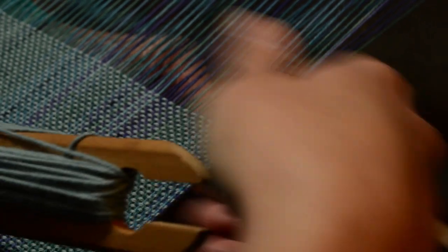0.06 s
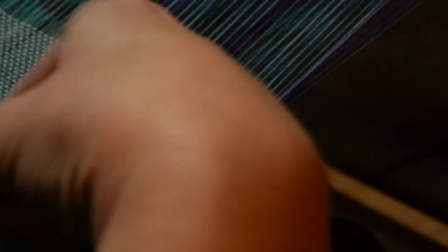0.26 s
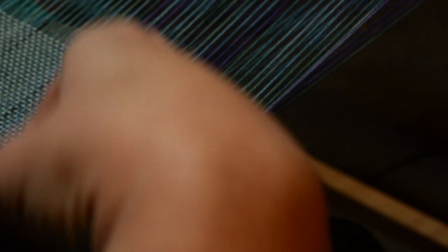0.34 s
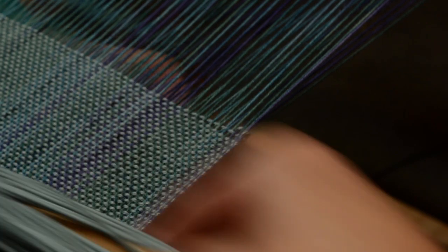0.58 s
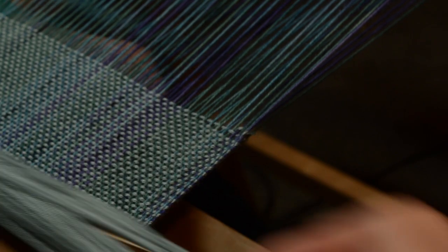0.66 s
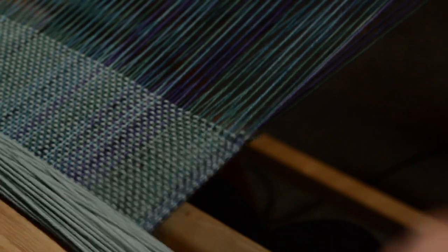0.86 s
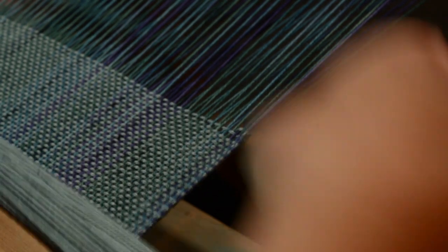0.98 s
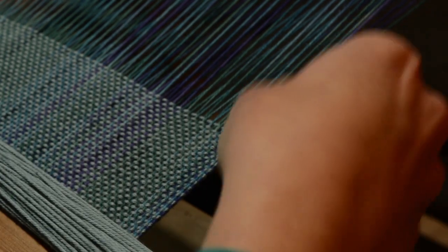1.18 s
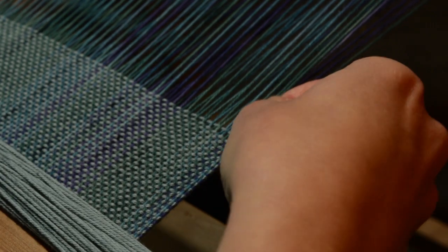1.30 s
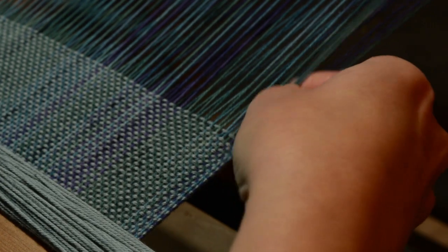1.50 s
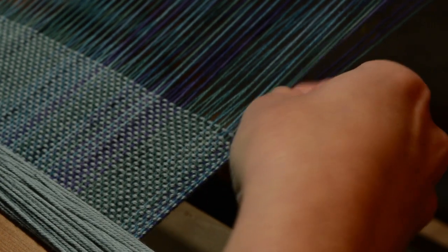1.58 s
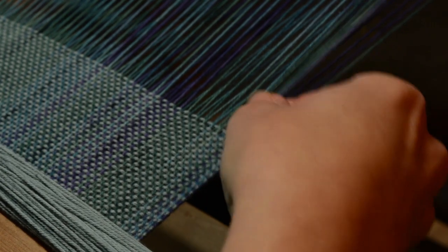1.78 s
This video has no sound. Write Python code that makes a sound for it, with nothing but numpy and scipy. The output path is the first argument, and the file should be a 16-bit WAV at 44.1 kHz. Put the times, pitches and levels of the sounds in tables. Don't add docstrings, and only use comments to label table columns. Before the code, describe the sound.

A wooden shuttle strikes a loom with one loud, dry clack, then chatters and scrapes briefly; yarn rustles, the frame thumps softly and fingers stroke taut threads, close-miked in a small quiet room.

```python
import sys
import numpy as np
from scipy import signal
from scipy.fft import rfft, irfft
from scipy.io import wavfile
from scipy.ndimage import uniform_filter1d

SR = 44100
rng = np.random.default_rng(int(sys.argv[2]) if len(sys.argv) > 2 else 0)


def put_to_file(sound):
    columns = np.atleast_2d(sound).T
    safe = np.clip(columns, -1, 1)
    whole_steps = np.round(safe * 32767)
    wavfile.write(sys.argv[1], SR, whole_steps.astype(np.int16))


def convert_level_to_amplitude(level_db):
    exponent = np.asarray(level_db, float) / 20
    return 10 ** exponent


N = 81585

# t/s, level/dB, contact/ms
KNOCKS = [
    (0.233, 2, 0.15),
    (0.7297, -31, 0.69),
]
# f/Hz, level/dB, T60/s
WOOD_MODES = [(237, -21.5, 0.083), (325, -21.5, 0.066), (498, -15.5, 0.045), (597, -20, 0.015),
              (879, -10, 0.025), (994, -15, 0.031), (1250, -12.5, 0.03), (1516, -11.5, 0.029),
              (1729, -13, 0.06), (2230, -14, 0.027), (2800, -9, 0.026), (3380, -14, 0.028),
              (3880, -26.5, 0.018)]
# f/Hz, width/Hz, level/dB
CLACK = [(1113.6, 460, 29.5), (2570, 1300, 16), (5220, 750, 7)]
# t/s, level/dB, f/Hz
TICKS = [(.1195, -37, 1500), (.1315, -34, 2900), (.1265, -30.5, 1410), (.1268, -35, 2750),
         (.139, -33, 3500), (.2392, -16, 1810), (.2418, -21, 3300), (0.2426, -19, 1750),
         (0.2494, -15.5, 1200), (.2505, -40, 5100), (.268, -43, 5000), (.259, -25, 1150),
         (.2635, -23, 1100), (.268, -27, 1150), (.2745, -26, 1300), (.281, -26, 1300), (.2845, -33, 1160),
         (.2645, -31, 3300), (.318, -35, 1300), (.393, -29, 1220), (.409, -30, 1050), (.4175, -27.5, 1090),
         (.421, -27, 3500), (.4455, -28, 2900), (.424, -22.5, 1280), (.431, -21.5, 1015),
         (.4405, -19.5, 2920), (.4415, -18, 1130), (.447, -20, 1320), (.453, -21, 1230),
         (.4585, -19.5, 1170), (.468, -29, 1250), (.475, -24.5, 1250), (.487, -28.5, 1140),
         (.5778, -23.5, 3030), (.5805, -27.5, 902), (.586, -25.5, 950), (.5915, -27, 1490),
         (.5945, -26.5, 1086), (.5965, -26, 4700), (.5985, -20, 2080), (.6045, -20, 1590),
         (.6095, -20, 2310), (.6135, -30.5, 1006), (.579, -33, 4700), (.579, -38, 491), (.5775, -19, 906),
         (.601, -30, 1900), (1.049, -46.5, 660), (1.051, -43, 1505), (1.056, -41.5, 3300),
         (1.403, -50, 4250)]
# t/s, level/dB, contact/ms
SCUFF_TAP = (.5777, -25, 0.066)

# start t/s, rise/s, hold/s, level/dB, fall T60/s
SCUFFS = [
    (.576, 0.0036, 0.012, -33.5, 0.09),
    (.585, 0.007, 0.021, -35, 0.045),
]
SLIDES = [
    (.238, 0.0034, 0.0018, -29.5, 0.21),
    (.33, 0.095, 0.02, -32.5, 0.19),
    (.43, 0.0099, 0.02, -33, 0.14),
    (.577, 0.0017, 0.03, -37, 0.04),
]
GRIPS = [
    (.25, 0.0097, 0.019, -42, 0.13),
    (.34, 0.081, 0.035, -34, 0.13),
    (.49, 0.049, 0.012, -40.5, 0.25),
    (.62, 0.0055, 0.036, -47, 1),
    (.7, 0.059, 0.053, -49, 0.7),
]
TOUCH = [
    (.112, 0.009, 0.014, -42, 0.092),
    (.125, 0.0071, .01, -46.5, 0.25),
]
YARN = [
    (.115, 0.011, 0.013, -54, 0.21),
    (.36, 0.073, 0.015, -46, 0.088),
    (.55, 0.045, 0.047, -45.5, 0.26),
    (.83, 0.04, 0.023, -42.5, 0.085),
    (.935, 0.0093, 0.0077, -50.5, .025),
]
FINGERS = [
    (1.2, 0.05, 0.025, -56, 0.59),
    (1.38, 0.019, 0.02, -54.5, 0.3),
    (1.44, .02, 0.017, -57, .1),
    (1.485, 0.016, 0.039, -49, 0.048),
    (1.575, 0.015, 0.031, -47, 0.35),
    (1.62, .02, .02, -50, 0.23),
    (1.665, 0.023, .02, -49, 0.17),
]
FLUFF = [
    (.25, 0.017, 0.036, -62, .1),
    (.49, 0.038, .04, -56, .1),
    (.61, 0.023, 0.051, -59, 0.13),
    (.69, 0.02, 0.043, -54, 0.33),
    (.905, 0.012, 0.0075, -47.5, 0.054),
    (1.39, 0.013, 0.011, -67, 0.066),
]
SWISH = [
    (0.811, 0.025, 0.066, -45.5, 0.11),
    (1.393, .008, .02, -60.5, .06),
    (1.3, 0.016, .04, -67, 0.22),
]
CLOTH = [
    (.62, 0.13, 0.19, -56, 0.31),
    (1.13, 0.2, .25, -61, .3),
    (1.58, 0.038, 0.064, -58, .2),
]

# f/Hz, width/Hz, level/dB
BEAM = [(587, 290, -7.5), (947, 170, -2.5), (1280, 130, -8), (1570, 470, -2), (2150, 460, 0),
        (3190, 350, 1.5), (4010, 90, -7.5), (4720, 660, 2), (6800, 4700, -7.5)]
SHUTTLE_BODY = [(283, 50, -12.5), (549, 150, -7.5), (659, 250, -9.5), (891, 58, -2.5), (1041, 46, -5),
                (1232, 160, -2.5), (1356, 280, -9.5), (1750, 370, -19), (2780, 150, -10.5),
                (3530, 210, -10.5)]
WARP = [(600, 430, -6.5), (1200, 630, -2), (1656, 440, -1), (2230, 380, -2.5), (2745, 310, -1),
        (3374, 320, 0), (4010, 320, -6), (4800, 500, -6), (6150, 4600, -11)]
SHUTTLE_TIP = [(1194, 370, -4), (1640, 300, -4), (2280, 350, -3), (2830, 230, -0.5), (3380, 250, 0.5),
               (4060, 200, -9.5), (4620, 650, -12.5), (7000, 5000, -15.5)]
THREADS = [(915, 210, -6), (1450, 160, -4), (1860, 100, -3), (2174, 160, 2.5), (2510, 100, -3.5),
           (3080, 460, 4.5), (4330, 650, -9), (7600, 1900, -6), (11600, 2700, -13)]
YARN_NAP = [(5000, 1600, -9.5), (7300, 2200, -0.5), (9300, 2500, -4), (12500, 5000, -6)]
SLEEVE = [(1400, 1200, -2.5), (2460, 350, -6.5), (3300, 830, -2), (4300, 1200, -1.5), (4840, 490, -7)]
CLOTH_BODY = [(270, 190, -1), (520, 590, -1.5)]

# f/Hz, level/dB per Hz
RUSTLE = [(880, -39.5), (1500, -7.5), (3120, -3), (3480, -6), (5710, -13), (7760, -9.5), (16000, -20.5)]
# t/s, level/dB, f/Hz, T60/s
THUMPS = [(0.232, -30, 141, 0.12), (0.238, -34, 70, 0.072), (0.269, -36, 73.4, 0.2),
          (.288, -33.5, 150, 0.064), (.285, -36, 472, 0.091), (.045, -43, 113, .1), (.93, -40, 60, 0.12),
          (.578, -34, 259, 0.078), (0.729, -37.5, 410, 0.031), (0.782, -31.5, 131, 0.054),
          (1.048, -29, 105, 0.095), (1.048, -35.5, 292, 0.033), (1.076, -33.5, 97, 0.058),
          (1.099, -41, 113, .1), (1.115, -43, 60, 0.096), (1.17, -41, 113, 0.09), (1.206, -45, 120, 0.089),
          (1.225, -38.5, 70, 0.12), (1.228, -49.5, 445, .06), (1.325, -46, 348, 0.067),
          (1.347, -44, 125, .07)]
# t/s, level/dB
HANDLING = [(0.0, -54), (0.024, -53.5), (0.2, -51.5), (0.236, -57.5), (0.344, -48), (0.42, -44.5),
            (.52, -49.5), (.58, -50), (0.716, -45.5), (0.772, -45.5), (0.995, -47.5), (1.06, -50.5),
            (1.151, -51.5), (1.4, -50), (1.85, -56)]
# f/Hz, level/dB per Hz
RUMBLE = [(25, -8.5), (60, 4), (120, -2), (250, -8.5), (450, -10), (800, -33.5)]
# f/Hz, level/dB per Hz
AIR = [(120, -29.5), (200, -7), (521, -13.5), (1110, -15), (3110, -17.5), (4330, -23), (6140, -26),
       (14900, -31), (16300, -33)]


def level(x, db):
    return x * convert_level_to_amplitude(db) / np.sqrt(np.mean(x ** 2))


def band(x, hz, width_hz):
    b, a = signal.iirpeak(hz, hz / width_hz, SR)
    return signal.lfilter(b, a, x)


def ring(x, hz, t60):
    pole = np.exp(2j * np.pi * hz / SR - np.log(1000) / (t60 * SR))
    return signal.lfilter([1], [1, -pole], x).imag


def push(start, ms, db):
    phase = (np.arange(N) / SR - start) * 1000 / ms
    return convert_level_to_amplitude(db) * np.sin(np.pi * np.clip(phase, 0, 1)) / (ms * SR / 1000)


def colour(x, points):
    hz, db = np.array(points).T
    f = np.fft.rfftfreq(N, 1 / SR) + 1
    gain = convert_level_to_amplitude(np.interp(np.log(f), np.log(hz), db, left=-50))
    return level(irfft(rfft(x) * gain, N), 0)


def walk(rate):
    hold = int(SR / rate)
    steps = np.repeat(rng.standard_normal(N // hold + 1), hold)
    return uniform_filter1d(steps, hold)[:N]


def strokes(rows):
    t = np.arange(N) / SR
    power = 0
    for start, rise, hold, db, t60 in rows:
        swell_db = -19.5 * np.clip(1 - (t - start) / rise, 0, 1)
        fall_db = -60 * np.maximum(t - start - rise - hold, 0) / t60
        power = power + (t > start) * convert_level_to_amplitude(db + swell_db + fall_db) ** 2
    return np.sqrt(power)


def slips(per_s, spread_db, patchy_db):
    hit = rng.random(N) < per_s / SR
    size_db = spread_db * np.minimum(rng.exponential(size=N), 2)
    size = convert_level_to_amplitude(size_db) * np.clip(rng.standard_normal(N), -2, 2)
    return hit * size * convert_level_to_amplitude(patchy_db * np.clip(walk(150), -2, 2))


def resonate(x, body):
    out = 0
    for k, (hz, width, db) in enumerate(body):
        mode = band(band(x, hz, 1.26 * width), hz, 1.26 * width)
        out = out + (-1) ** k * convert_level_to_amplitude(db) * mode / np.sqrt(width)
    return out


def rubbed(rows, body, clicks):
    return resonate(clicks * strokes(rows), body) / np.std(resonate(clicks, body))


def contact_crack():
    t = np.arange(N) / SR
    gain = 0
    for start, db in ((KNOCKS[0][0], -46.5), (SCUFF_TAP[0], -32.5)):
        gain = gain + (t > start) * convert_level_to_amplitude(db - 60 * np.maximum(t - start, 0) / 0.004)
    return gain * band(rng.standard_normal(N), 7000, 10500)


def shuttle_knocks():
    force = sum(push(start, ms, db) for start, db, ms in KNOCKS)
    out = contact_crack()
    for hz, width, db in CLACK:
        out = out + convert_level_to_amplitude(db) * band(band(band(force, hz, width), hz, width), hz, width)
    for k, (hz, db, t60) in enumerate(WOOD_MODES):
        out = out + (-1) ** k * convert_level_to_amplitude(db) * band(ring(force, hz, t60), hz, hz / 2)
    return out


def shuttle_chatter():
    out = 0
    for start, db, hz in TICKS:
        t60 = 13.9 / hz
        tick = ring(push(start, 300 / hz, db + 7.5), hz, t60)
        out = out + band(band(tick, hz, 0.68 * hz), hz, 0.68 * hz)
    return out


def beam_scuff():
    start, tap_db, ms = SCUFF_TAP
    force = push(start, ms, tap_db)
    tap = 0
    for k, (hz, width, db) in enumerate(BEAM):
        tap = tap + (-1) ** k * convert_level_to_amplitude(db) * ring(force, hz, 4 / width)
    return tap + rubbed(SCUFFS, BEAM, slips(6000, 1.8, 0.6))


def shuttle_rubs():
    slides = rubbed(SLIDES, SHUTTLE_BODY, slips(2500, 3.5, 0.65))
    drags = rubbed(GRIPS, WARP, slips(6000, 2.28, 0.91))
    tip = rubbed(TOUCH, SHUTTLE_TIP, slips(8900, 1.0, 0.7))
    return slides + drags + tip


def yarn():
    rustle = strokes(YARN) * colour(slips(20000, 0.95, 0.7), RUSTLE)
    return rustle + rubbed(FLUFF, YARN_NAP, slips(15000, 1.1, 0.74))


def fingers():
    return rubbed(FINGERS, THREADS, slips(8000, 1.3, 0.46))


def fabric():
    sleeve = rubbed(SWISH, SLEEVE, slips(9000, 1.6, 1.0))
    return sleeve + rubbed(CLOTH, CLOTH_BODY, slips(900, 1.7, 0.92))


def frame():
    thumps = 0
    for start, db, hz, t60 in THUMPS:
        thump = ring(push(start, 300 / hz, db + 4.5), hz, t60)
        thumps = thumps + band(thump, hz, 3.3 * hz)
    times, levels_db = np.array(HANDLING).T
    rumble_db = np.interp(np.arange(N) / SR, times, levels_db) - 1.0 + 3.0 * walk(30)
    return thumps + convert_level_to_amplitude(rumble_db) * colour(rng.standard_normal(N), RUMBLE)


def room_echo(near):
    t60_s, echo_db, top_hz = 0.28, -18, 3900
    t = np.arange(SR // 2) / SR
    tail = band(rng.standard_normal(len(t)), top_hz / 3, top_hz)
    tail = tail * convert_level_to_amplitude(-60 * t / t60_s) * (t > 0.004)
    tail = tail * convert_level_to_amplitude(echo_db) / np.sqrt(np.sum(tail ** 2))
    return signal.fftconvolve(near, tail)[:N]


def air():
    hiss = convert_level_to_amplitude(-57) * colour(rng.standard_normal(N), AIR)
    whine = band(rng.standard_normal(N), 1540, 30)
    return hiss + level(whine, -73)


def scene():
    near = shuttle_knocks() + shuttle_chatter() + beam_scuff() + shuttle_rubs()
    near = near + yarn() + fingers() + fabric()
    return (near + room_echo(near) + frame() + air())[None]


def band_limit(x):
    return signal.sosfilt(signal.butter(12, 16450, fs=SR, output="sos"), x)


def record(dry):
    low_cut = signal.butter(1, 34, "high", fs=SR, output="sos")
    top_cut = signal.ellip(8, 0.2, 50, 15830, fs=SR, output="sos")
    mix = signal.sosfilt(top_cut, signal.sosfilt(low_cut, dry))
    mix = mix / max(1, np.abs(mix).max() / 0.97)
    return band_limit(mix)


dry = scene()
out = record(dry)
put_to_file(out)
```